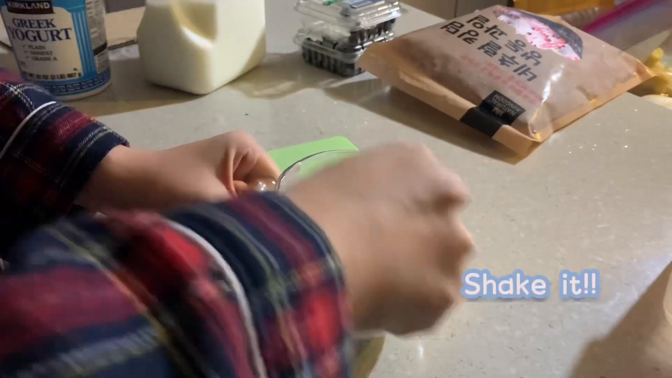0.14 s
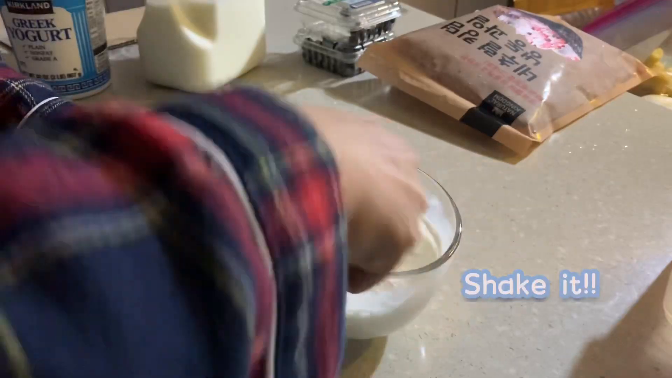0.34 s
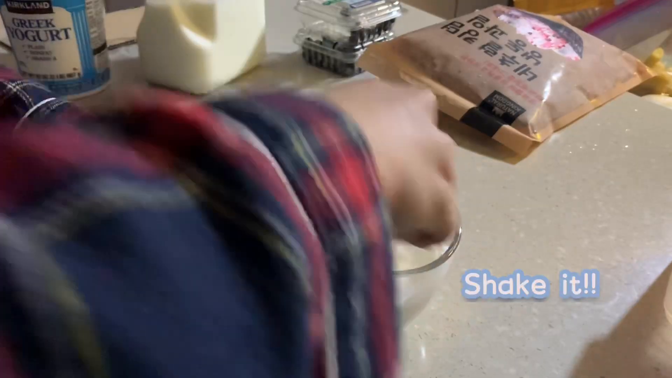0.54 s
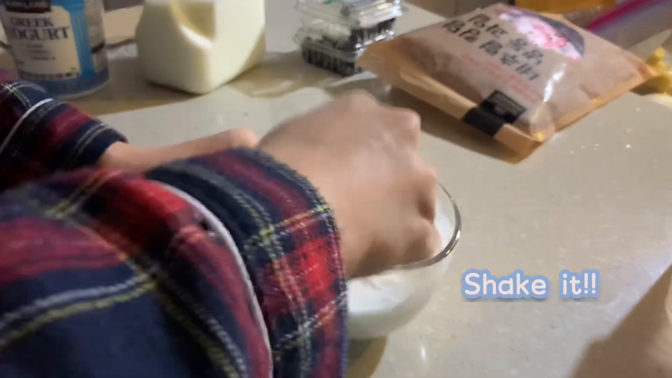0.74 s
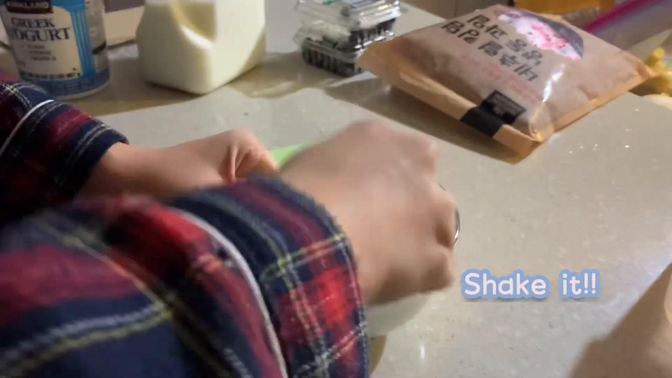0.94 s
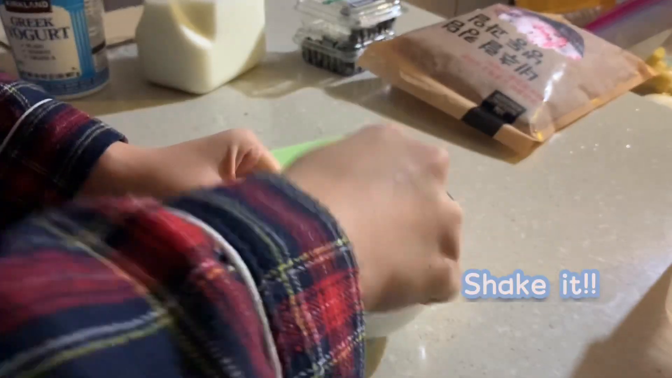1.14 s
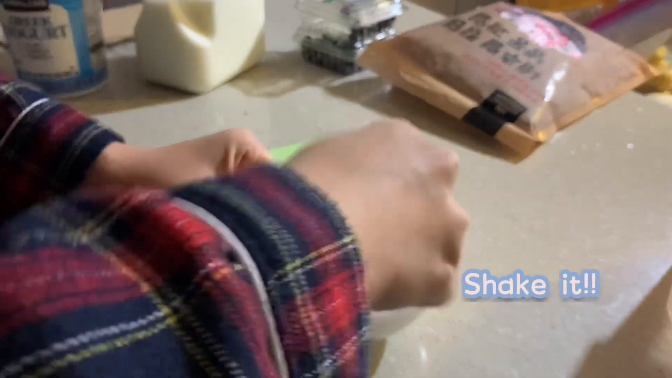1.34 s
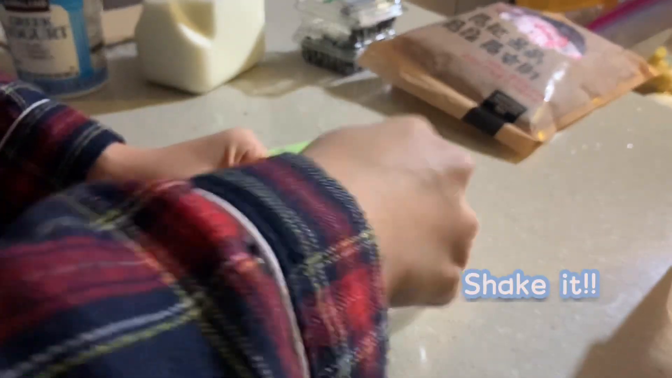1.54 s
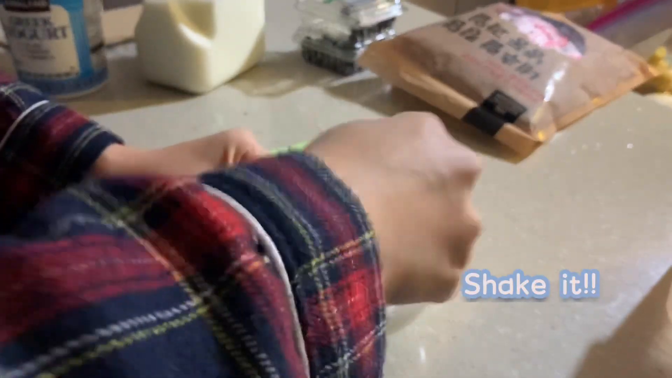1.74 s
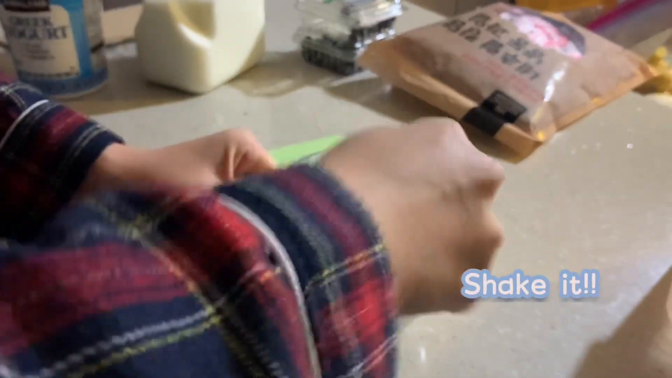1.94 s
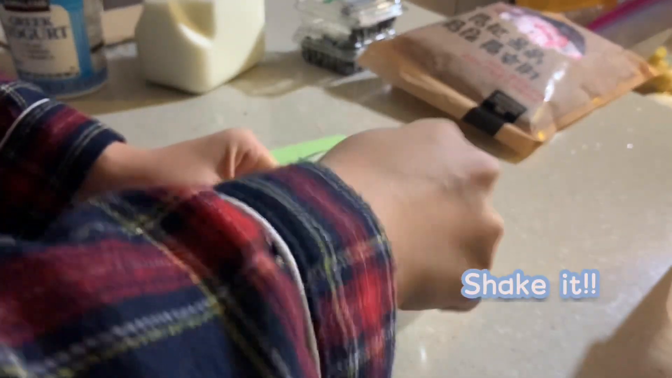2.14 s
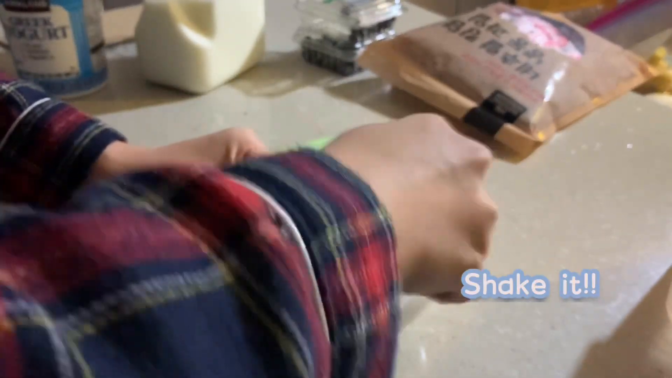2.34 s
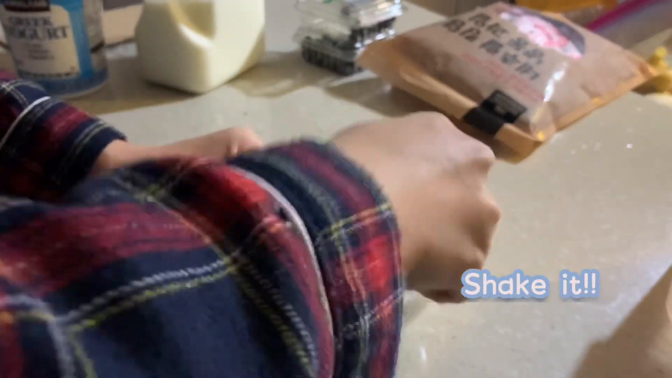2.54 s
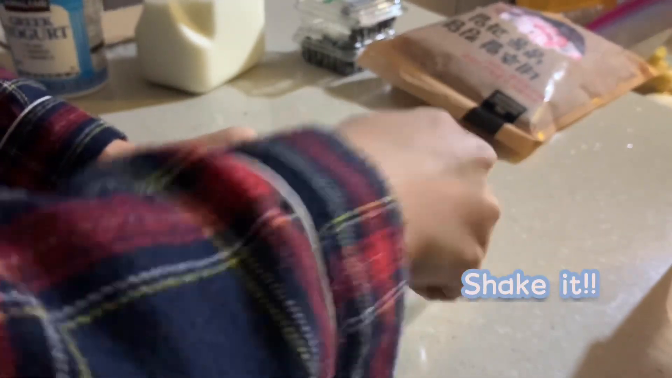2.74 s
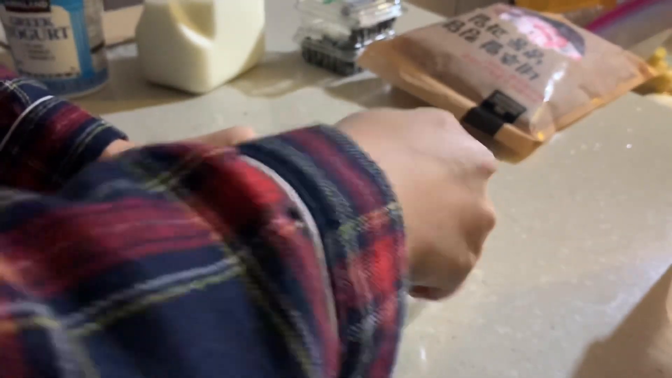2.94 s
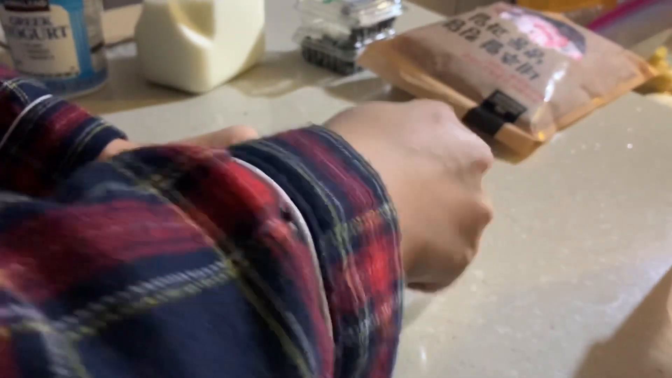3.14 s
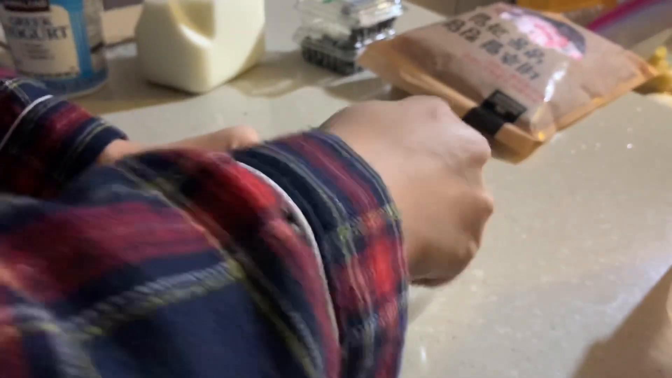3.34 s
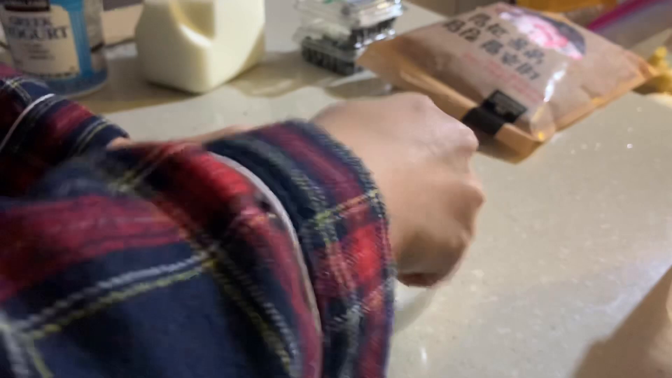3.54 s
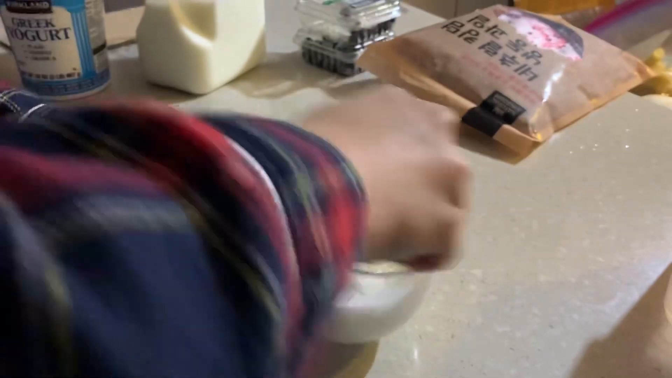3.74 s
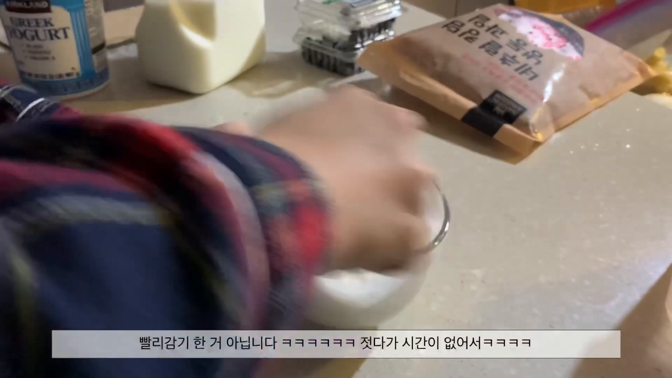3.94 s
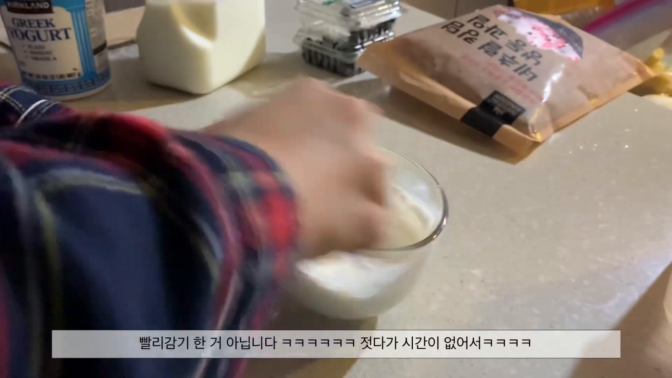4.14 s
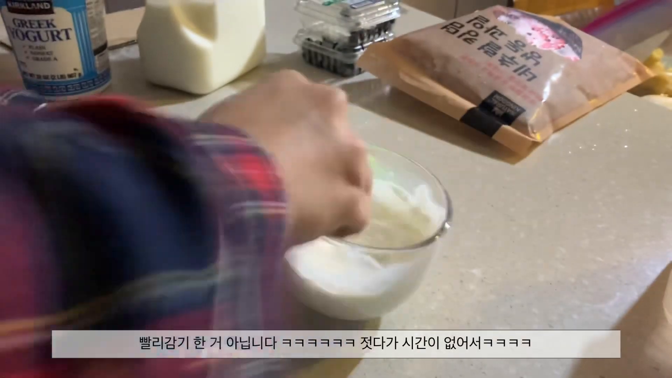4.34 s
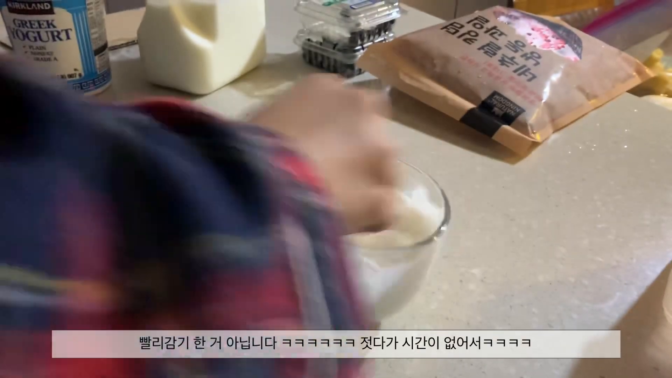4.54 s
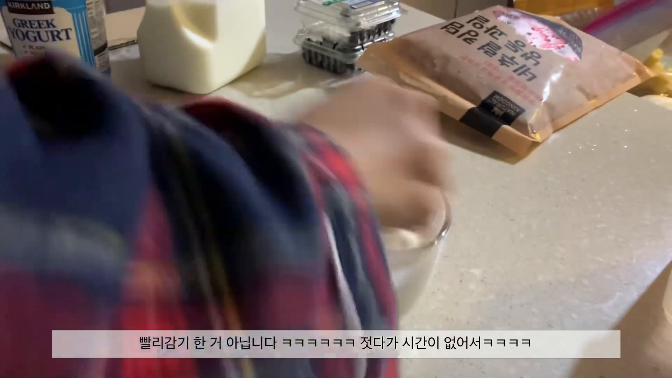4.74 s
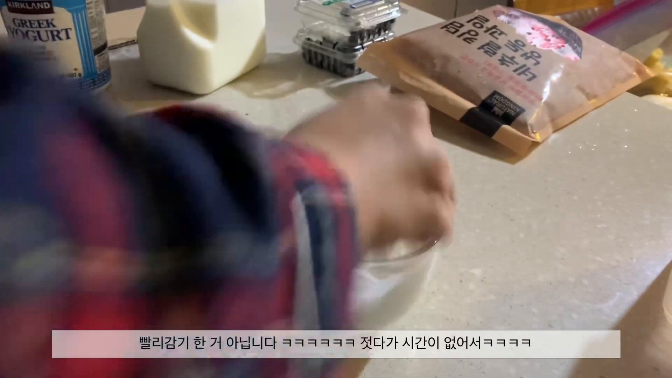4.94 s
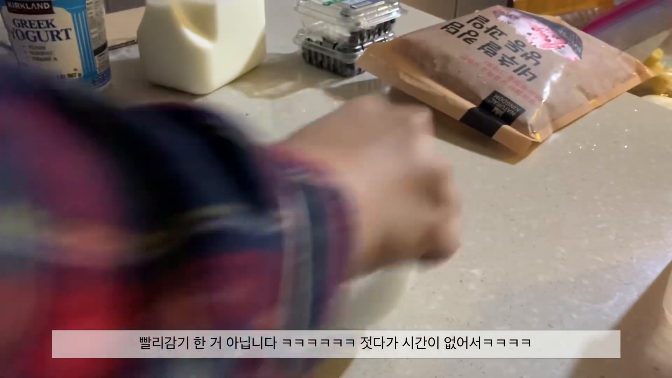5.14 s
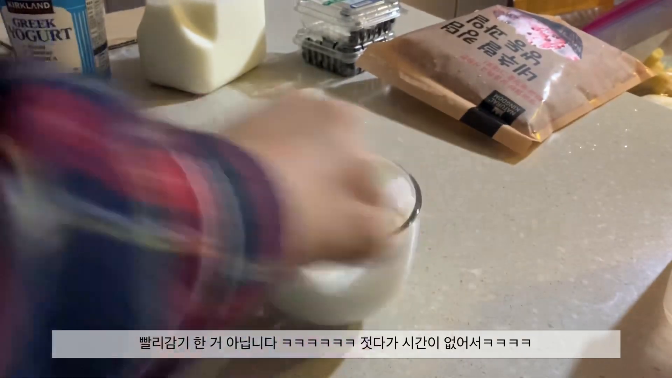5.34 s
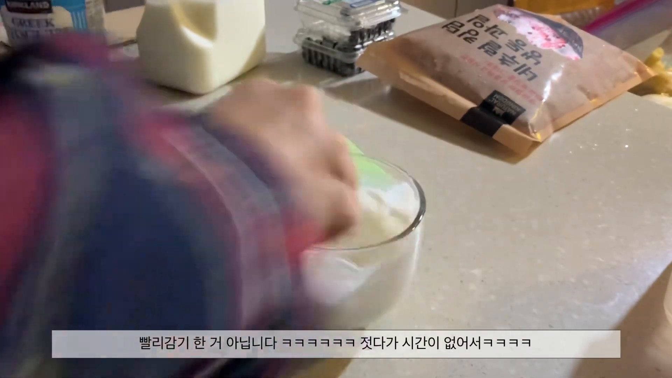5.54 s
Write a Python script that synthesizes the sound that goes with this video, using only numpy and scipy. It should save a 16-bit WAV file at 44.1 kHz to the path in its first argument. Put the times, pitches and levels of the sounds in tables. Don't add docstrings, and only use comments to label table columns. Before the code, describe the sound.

Close wet clinks of a spoon in a glass mug, regular at first, ending in hectic stirring with mug rattling and counter thumps.

```python
import sys
import numpy as np
from scipy import signal
from scipy.io import wavfile

SR = 44100
rng = np.random.default_rng(int(sys.argv[2]) if len(sys.argv) > 2 else 0)


def master_out(mix):
    frames = np.transpose(np.atleast_2d(mix))
    ceiling = np.clip(frames, -1, 1)
    pcm = np.round(ceiling * 32767).astype(np.int16)
    wavfile.write(sys.argv[1], SR, pcm)


def voltage_ratio(decibels):
    exponent = np.asarray(decibels, float) / 20
    return 10 ** exponent


N = 251370
LEAD = 4410


def rms_one(x):
    return x / np.sqrt(np.mean(x ** 2) + 1e-20)


def butter(x, order, hz, kind="low"):
    return signal.sosfilt(signal.butter(order, hz, kind, fs=SR, output="sos"), x)


def at_hz(points, hz, column=1):
    return np.interp(np.log(hz), np.log(np.array(points)[:, 0]), np.array(points)[:, column])


def in_time(rows):
    s, value = np.transpose(rows)
    return np.interp((np.arange(N + LEAD) - LEAD) / SR, s, value)


def train(times, level_db):
    clicks = np.zeros(N + LEAD)
    np.add.at(clicks, np.round(times * SR).astype(int) + LEAD, voltage_ratio(level_db))
    return clicks


def ring(clicks, hz, t60):
    r = voltage_ratio(-60 / (t60 * SR))
    w = 2 * np.pi * hz / SR
    return signal.lfilter([0, np.sin(w)], [1, -2 * r * np.cos(w), r * r], clicks + 1e-18)


def strike(times, level_db, modes, spread_db, contact_s, travel_s=0.):
    out = 0
    luck = rng.standard_normal((len(times), len(modes)))
    push = np.hanning(max(round(contact_s * SR), 1) + 2)[1:-1]
    for k, (hz, left_db, right_db, t60) in enumerate(modes):
        arrival = times + travel_s * np.sqrt(300 / hz)
        clicks = train(arrival, level_db + spread_db * luck[:, k])
        force = np.convolve(clicks, push)[:N + LEAD]
        loss = abs(np.sum(push * np.exp(-2j * np.pi * hz / SR * np.arange(len(push)))))
        sides = voltage_ratio(np.array([[left_db], [right_db]]))
        out = out + ring(force / loss, hz, t60) * sides * (-1) ** k
    return out


def crack(times, level_db, low_hz, high_hz, t60, alike):
    fade = signal.lfilter([1], [1, -voltage_ratio(-60 / (t60 * SR))], train(times, level_db) + 1e-18)
    mid, side = rng.standard_normal((2, N + LEAD))
    burst = fade * (mid + (1 - alike) * side * [[1], [-1]])
    burst = butter(burst, 3, low_hz, "high")
    burst = butter(burst, 1, high_hz)
    return butter(burst, 3, 2.435 * high_hz)


def bands(length, low_hz, count):
    white = rng.standard_normal((2, 2, length))
    for k in range(count):
        low = low_hz * 2 ** (k / 2)
        high = min(low_hz * 2 ** (k / 2 + .5), .45 * SR)
        yield np.sqrt(low * high), butter(white[k % 2], 2, [low, high], "band")


# t/s, level/dB
EFFORT = [(0.0, 5), (0.13, -0.9), (1.09, -0.7), (1.78, 2), (3.3, 3.5), (3.46, -3.5), (3.84, 6), (4.21, 4.5),
          (4.52, 9.5), (4.7, 9.5), (5.11, 14), (5.27, 14.5), (5.46, 12), (5.59, 11), (5.7, 2)]


def arm_effort():
    return in_time(EFFORT)


# f/Hz, level/dB (per Hz)
RUMBLE = [(15, -62), (25, -21), (37, -27.5), (46, -7.5), (70, -2.5), (92, -20.5), (147, -9.5), (172, -26),
          (389, -35), (696, -41.5), (1340, -44.5), (1770, -53), (6500, -60.5), (8450, -91), (14300, -120)]
# f/Hz, likeness (1 = the same)
LIKENESS = [(60, 0.96), (240, 0.89), (950, -0.59), (3770, -0.81), (15000, -1.1)]


def rumble(effort_db):
    out = 0
    for hz, (mid, side) in bands(N + LEAD, 24.64, count=16):
        alike = np.clip(at_hz(LIKENESS, hz), 0, .99)
        both = np.sqrt(1 + alike) * mid + np.sqrt(1 - alike) * side * [[1], [-1]]
        out = out + voltage_ratio(at_hz(RUMBLE, hz)) * both
    return voltage_ratio(-55.5 + effort_db) * rms_one(out)


# lowest f/Hz, highest f/Hz, level/dB
HISS_BANDS = [(3000, 7000, -6), (7700, 11000, 0), (12400, 15500, 0)]


def hiss(effort_db):
    white = rng.standard_normal((2, N + LEAD))
    noise = 0
    for low_hz, high_hz, level_db in HISS_BANDS:
        noise = noise + voltage_ratio(level_db) * rms_one(butter(white, 6, [low_hz, high_hz], "band"))
    late = in_time([(3.55, 0), (3.81, 1)])
    late_hiss = late * voltage_ratio(-83.5 + .15 * effort_db)
    return np.hypot(voltage_ratio(-87.5), late_hiss) * noise


FIRST_BOUNCE_S = .00381
# left t/s, right t/s, left level/dB, right level/dB
ECHOES = [(FIRST_BOUNCE_S, FIRST_BOUNCE_S, -33, -21.5), (.0085, .011, -24, -11.5),
          (.041, 0.047, -42.5, -29), (0.045, 0.057, -31, -28.5), (.065, .066, -40.5, -39.5),
          (0.115, .111, -54, -31), (0.13, 0.11, -32, -27)]
# f/Hz, level/dB, t/s to fall by 60 dB
TAIL = [(150, -28, 0.27), (403, -20, 0.3), (1080, -18.5, 0.4), (1464, -24, 0.47), (2870, -25, 0.46),
        (4400, -24, 0.35), (10200, -27.5, .2)]


def kitchen(x):
    t = np.arange(SR * 7 // 10) / SR
    answer = np.zeros((2, len(t)))
    for left_s, right_s, left_db, right_db in ECHOES:
        answer[[0, 1], [round(left_s * SR), round(right_s * SR)]] += voltage_ratio(np.array([left_db, right_db]))
    answer = butter(answer, 2, 2800)
    swell = 1 - np.exp(-(t / 0.0009) ** 2)
    for hz, noise in bands(len(t), 105.1, count=14):
        fade_db = -60 * t / at_hz(TAIL, hz, column=2)
        answer += noise * swell * voltage_ratio(at_hz(TAIL, hz) + fade_db - 14.5)
    return signal.fftconvolve(x, answer, axes=1)[:, :x.shape[1]]


def slab(times, level_db):
    hz, t60_s, lag_s = 62, .13, .004
    once = ring(train(times + lag_s, level_db - 3), hz, t60_s)
    twice = ring(once, hz, t60_s)
    top = t60_s * SR / np.log(1000) / (2 * np.e)
    return twice / top * voltage_ratio(np.array([[-1.3], [1.3]]))


# f/Hz, left level/dB, right level/dB, t/s to fall by 60 dB
COUNTER = [(129.2, -23.5, -24, 0.37), (219.3, -1.5, 0.5, 0.12), (259.4, -3.5, -2.5, 0.055),
           (351.8, -2.5, 0.5, 0.063), (443, -15.5, -9.5, 0.049), (527.6, -11, -8, 0.039),
           (676, -2, -5.5, 0.02), (831.8, -10, -10.5, 0.0055)]


def counter(times, level_db, spread_db, contact_s, travel_s=0.):
    return strike(times, level_db, COUNTER, spread_db, contact_s, travel_s)


def chatter_db(times, landing_s, landing_db):
    rest_db, fade_db_per_s = -56.5, 108
    since = times[:, None] - landing_s
    left_db = np.where(since > 0, landing_db - 18.5 - fade_db_per_s * since, rest_db)
    return np.maximum(left_db.max(axis=1), rest_db)


EARLIER_S, FIRST_KNOCK_S = -.03, .073
# t/s, peak level/dB, glass
# edge level/dB, slab level/dB
LANDINGS = [
    (EARLIER_S, -39, 2.3, -14),
    (FIRST_KNOCK_S, -54, 15.6, -13),
            (3.596, -51, -11, 9), (3.744, -38.5, -1.5, 30), (3.998, -35.5, -27, -4), (4.356, -30, -16, -2),
          (4.569, -23, -17.5, -23), (4.654, -33, -10.5, -17), (4.805, -24.5, -13.5, 4),
          (4.894, -31, -11.5, 0.1), (5.015, -22, -16, -2), (5.031, -32, -5, 0), (5.04, -20, -16, -14),
          (5.054, -29, -9.5, -9), (5.065, -47, 1.5, 11), (5.166, -20.5, -14.5, 9), (5.18, -30, -5, -23),
          (5.213, -12.5, -15.5, -10), (5.221, -29.5, 9.5, -12), (5.231, -25, 4, 9),
          (5.238, -13, -16.5, -13), (5.431, -18.5, -18, 1), (5.436, -32.5, -6, -4), (5.456, -16, -8, -9),
          (5.463, -23, -9.5, 0.1), (5.476, -37, -51, -11), (5.6, -18.5, -12, -7), (5.611, -28, -18, -7)]
# f/Hz, left level/dB, right level/dB, t/s to fall by 60 dB
FOOT = [(941, 11.5, 10, 0.052), (1520, -18.5, 18.5, 0.017), (2110, 10, 17, 0.0057), (2810, 6.5, 4, 0.025)]


def mug():
    s, peak_db, edge_db, slab_db = np.transpose(LANDINGS)
    out = counter(s, peak_db - 3.5, spread_db=1.5, contact_s=0.0013, travel_s=0.0018)
    out += strike(s, peak_db + edge_db - 13.5, FOOT, spread_db=1.5, contact_s=0.00031)
    out += crack(s, peak_db + edge_db + 7.0, low_hz=520, high_hz=1544, t60=0.052, alike=0.43)
    touches = np.sort(rng.uniform(3.62, 5.68, 540))
    luck = np.minimum(rng.standard_normal(len(touches)), 1.8)
    touch_db = chatter_db(touches, s, peak_db) + 9.5 * luck
    out += counter(touches, touch_db - 15.0, spread_db=2.5, contact_s=0.0016)
    out += crack(touches, touch_db - 5.5, low_hz=247, high_hz=696, t60=0.066, alike=0.27)
    return out, slab(s, peak_db + slab_db - 23.0)


def lead_in_swell(times, level_db, rise_s):
    backwards = train(times, level_db)[::-1] + 1e-18
    swell = signal.lfilter([1], [1, -np.exp(-1 / (rise_s * SR))], backwards)[::-1]
    rustle = swell * rng.standard_normal((2, N + LEAD))
    return butter(rustle, 2, [1000, 2200], "band")


# f/Hz, left level/dB, right level/dB, t/s to fall by 60 dB
WALL = [(915, -11, -11, .016), (990, -8, -7.5, .015), (1075, -8.5, -8, .016), (1165, -8, -8, .02),
        (1285, -1, -1.5, .025)]
MIDDLE_WALL = [(1329, -6, -5.5, 0.024)]
UPPER_WALL = [(1500, 0, -10, .024), (1750, -9, -13, .013)]


def glass_wall(s, peak_db, rim_db, hard_db):
    low_db = peak_db + 3.5 - 0.33 * s
    upper_db = peak_db + 2 + 0.21 * rim_db + 0.18 * hard_db + 0.74 * s
    out = strike(s - .0003, low_db, WALL, spread_db=.7, contact_s=.0005)
    out -= strike(s - .00041, upper_db + 8, UPPER_WALL, spread_db=.7, contact_s=.0005)
    out += strike(s, upper_db + 4.5, MIDDLE_WALL, spread_db=4.5, contact_s=0.00032)
    return out


# f/Hz, left level/dB, right level/dB, t/s to fall by 60 dB
EDGE = [(1961, 1.5, 3, 0.032), (2330, 8.5, 8, 0.0081), (2824, -18, -16, 0.0088)]


def glass_edge(s, peak_db, rim_db):
    light_db = -29.5
    level_db = peak_db + 3 + 0.43 * rim_db + 0.43 * np.maximum(peak_db, light_db)
    out = strike(s, level_db - 3.5, EDGE, spread_db=1.5, contact_s=0.00053)
    return out + crack(s, level_db + 3.5, low_hz=1650, high_hz=1820, t60=0.052, alike=0.33)


# f/Hz, left level/dB, right level/dB, t/s to fall by 60 dB
RIM = [(2510, -3.5, -3, 0.026), (2696, 1, 0.5, 0.017)]
HIGH_RIM = [(4450, -3.5, -3, 0.023), (4170, -3.5, -6.5, .02)]


def glass_rim(s, peak_db, rim_db, hard_db):
    high_db = peak_db - 1.5 + 0.74 * rim_db + 0.41 * hard_db
    out = strike(s + .0012, peak_db + rim_db + 1.5, RIM, spread_db=1.5, contact_s=.0002)
    return out + strike(s + .0012, high_db + 1.5, HIGH_RIM, spread_db=2.5, contact_s=.0001)


# f/Hz, left level/dB, right level/dB, t/s to fall by 60 dB
TICK = [(3880, 6, 5.5, 0.0049), (3660, -3.5, -10.5, 0.014), (4810, -9, 0.5, 0.0044),
        (6180, -15.5, -8, 0.011)]


def glass_tick(s, level_db):
    out = strike(s, level_db + 5.0, TICK, spread_db=1.5, contact_s=0.000053)
    return out + crack(s, level_db + 4.0, low_hz=3170, high_hz=3100, t60=0.021, alike=0.16)


# f/Hz, left level/dB, right level/dB, t/s to fall by 60 dB
STEEL = [(8390, 4, 1, 0.0035), (9100, -6.5, 0, 0.0042), (9750, -5, -9, 0.0029), (13500, -10.5, -10, .004),
         (14600, -10.5, -13.5, .004)]
# t/s, peak level/dB
RATTLES = [
    (5.1302, -41.5),
    (5.2235, -53),
    (5.2315, -47),
    (5.5987, -60),
]


def spoon_steel(s, peak_db, hard_db):
    steel_db = 3.5 + 2.21 * peak_db + 0.28 * hard_db
    rattle_s, rattle_db = np.transpose(RATTLES)
    times = np.r_[s + .0005, rattle_s + .0013]
    return strike(times, np.r_[steel_db, rattle_db], STEEL, spread_db=1.5, contact_s=.00004)


# t/s, peak level/dB, nearness to the rim level/dB, hardness level/dB
STROKES = [(0.8254, -16, -20.5, -39), (1.042, -15, -25, -40), (1.2315, -14, -21.5, -27.5),
           (1.4156, -14, -20, -21), (1.5874, -18.5, -16.5, -20.5), (1.7579, -19, -14.5, -19.5),
           (1.936, -23.5, -12, -23), (2.1083, -25, -14.5, -17), (2.278, -19, -16, -19.5),
           (2.4634, -19.5, -13.5, -16.5), (2.6446, -20, -13.5, -17), (2.8244, -20.5, -15, -15.5),
           (3.0121, -27.5, -1.5, -8), (3.2073, -26, -3, -7.5), (3.4153, -25, -3, -25),
           (3.7098, -30, -18.5, -33), (3.9387, -29, -15.5, -36), (4.1521, -22.5, -11.5, -34),
           (4.3854, -20, -11.5, -16.5), (4.6101, -29.5, -15, -26), (4.8531, -25, -12, -37.5),
           (5.087, -26, -3.5, -24), (5.3426, -25.5, -2.5, -12), (5.5752, -32, -5.5, -35)]
EARLIER_STROKE = (EARLIER_S, -25.5, -21, -7)
GRAZES = [(0.0738, -41.5, -3, -6.5), (0.5272, -48.5, -50, -53), (0.6441, -60, -41, -36),
          (1.6262, -27.5, -15, -28), (1.7994, -22, -12, -41), (2.1341, -31.5, -27, -18.5),
          (3.4864, -36.5, -10, -26), (3.7451, -47, -3, -5), (4.2409, -32.5, -16.5, -45),
          (4.2607, -52, -2, -9), (4.6626, -44.5, 5.5, -34), (4.9094, -31, -9, -29.5),
          (5.1318, -29.5, -41, -12)]


def spoon():
    s, peak_db, rim_db, hard_db = np.transpose([*STROKES, EARLIER_STROKE, *GRAZES])
    glass = lead_in_swell(s, peak_db - 11.5, rise_s=0.0049)
    glass += glass_wall(s, peak_db, rim_db, hard_db)
    glass += glass_edge(s, peak_db, rim_db)
    glass += glass_rim(s, peak_db, rim_db, hard_db)
    glass += glass_tick(s, peak_db + hard_db)
    glass += spoon_steel(s, peak_db, hard_db)
    glass = butter(glass, 4, 800, "high")
    shove_db = -29 + 0.64 * peak_db + 3 * s
    shove = counter(s, shove_db - 4.5, spread_db=2.0, contact_s=0.002503, travel_s=.0015)
    return glass + shove, slab(s, shove_db)


def scene():
    effort_db = arm_effort()
    floor = rumble(effort_db) + hiss(effort_db)
    knocks, rock = mug()
    clacks, sway = spoon()
    near = clacks + knocks
    near[1] = np.roll(near[1], 4)
    return (near + kitchen(near) + sway + rock + floor)[:, LEAD:]


def deaf(x, low_hz, high_hz, left_db, order):
    cut = butter(x, order, [low_hz, high_hz], "stop")
    return cut + voltage_ratio(left_db) * (x - cut)


def roll_off(x):
    return signal.sosfilt(signal.butter(12, 16450, fs=SR, output="sos"), x)


def record(dry):
    x = butter(dry, 6, 42, "high")
    x = deaf(x, 7070, 7300, left_db=-16.5, order=1)
    x = deaf(x, 11120, 12300, left_db=-18, order=3)
    x = signal.sosfilt(signal.cheby2(10, 50, 16500, fs=SR, output="sos"), x)
    return roll_off(x)


dry = scene()
out = record(dry)
master_out(out)
```